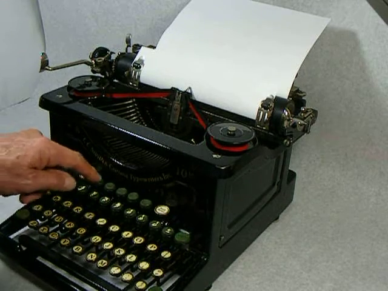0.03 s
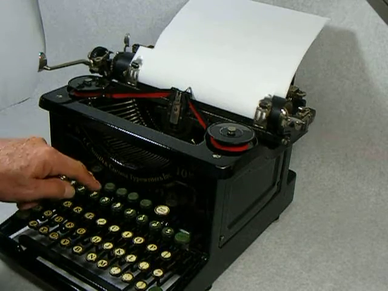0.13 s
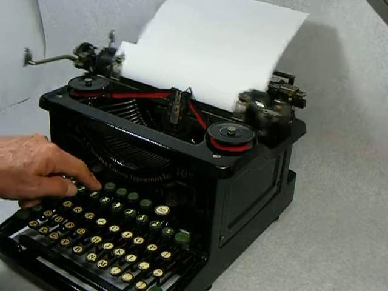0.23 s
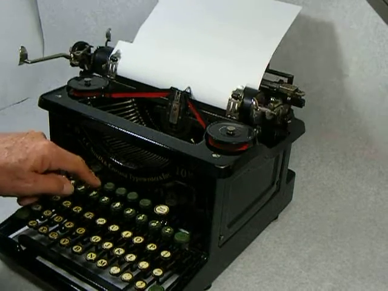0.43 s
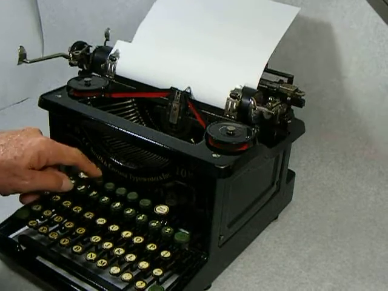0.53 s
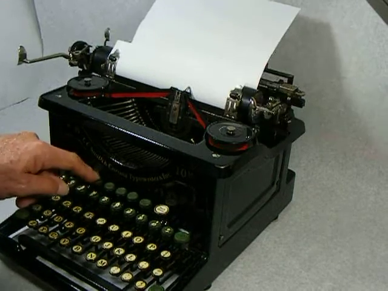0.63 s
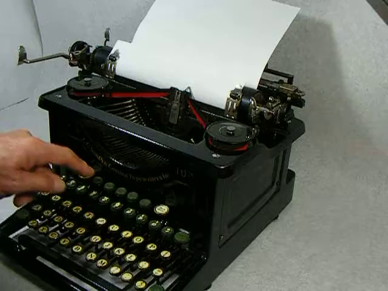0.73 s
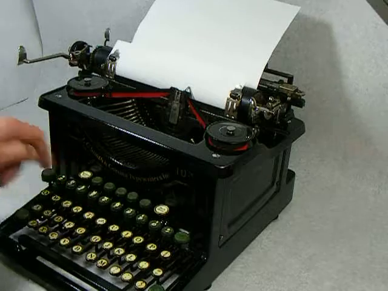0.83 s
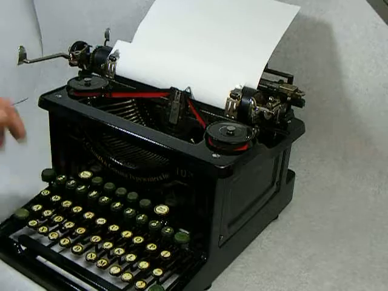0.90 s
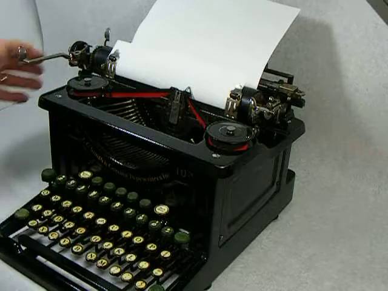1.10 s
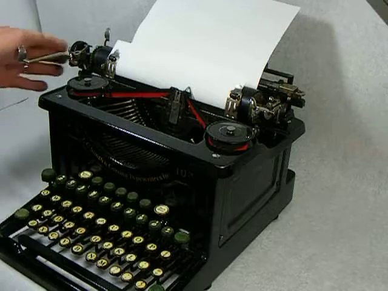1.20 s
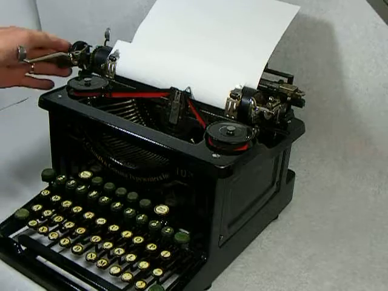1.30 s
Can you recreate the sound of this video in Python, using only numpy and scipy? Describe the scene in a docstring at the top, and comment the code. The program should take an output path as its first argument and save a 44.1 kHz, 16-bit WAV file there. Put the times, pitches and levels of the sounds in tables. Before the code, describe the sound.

An old typewriter key is struck, its heavy carriage rolling and clacking hard to a stop indoors

```python
"""Old typewriter key stroke

A key of an old cast-iron typewriter is pressed: the carriage is let go, rolls along its rail and slams into a stop;
the key is let up with a second clack and the parts settle. Blows and rolling are showers of tiny contacts
that ring the modes of the machine. A drone, ringing springs, a small room's echo and steady noise are added.
The recorder is coarse: few samples, big level steps and one click."""
import sys
import numpy as np
from scipy import signal
from scipy.fft import rfft, irfft
from scipy.io import wavfile
from scipy.ndimage import uniform_filter1d, map_coordinates

SR = 44100
rng = np.random.default_rng(int(sys.argv[2]) if len(sys.argv) > 2 else 0)


def convert_level_to_amplitude(level_db):
    """Map a level in decibels to its linear amplitude factor."""
    exponent = np.asarray(level_db, float) / 20
    return 10 ** exponent


def materialize(psi):
    """Save the field psi as 16-bit PCM at rate SR to the path in sys.argv[1].

    A 1-D psi becomes a single channel; in a 2-D psi each row is a channel.
    """
    bounded = np.clip(np.atleast_2d(psi).T, -1, 1)
    quanta = np.round(bounded * 32767).astype(np.int16)
    wavfile.write(sys.argv[1], SR, quanta)


N = 59535  # length in samples

# Blows of metal on metal, then parts settling. Each row: start in seconds, relative level in dB,
# strongest pitch in Hz, fall in dB one octave away, time in seconds for the rattle to fall 60 dB.
BLOWS = [(.176, -39, 1220, 10, .1), (.2055, -14, 2480, 7, 0.056), (0.207, -11, 5000, 16, 0.059),
         (.236, -16, 880, 1.5, 0.054), (.255, -23, 1800, -0.5, 0.071), (.326, -18, 1800, 14.5, .06),
         (0.3951, -7, 1844, 4.5, 0.017), (.398, -13, 190, 4.5, 0.091), (0.417, -14, 606, 7.5, 0.026),
         (.412, -15.5, 1800, 1, 0.045), (.431, -18.5, 1058, 14.5, 0.028), (0.458, -21.5, 2440, 3.5, 0.07),
         (.511, -22.5, 596, 2, 0.056), (.587, -29, 2600, 11, 0.15), (.611, -13.5, 3170, 8, 0.083),
         (.629, -7.5, 1100, 4.5, 0.021), (.638, -8.5, 178.5, 6.5, 0.041), (.642, -14.5, 1654, 1.5, 0.039),
         (.663, -24.5, 2145, -1, 0.061), (.737, -31, 2550, 8, 0.047), (.785, -26.5, 650, 7, 0.16),
         (.82, -29.5, 1930, 3.5, 0.034), (0.876, -38, 2514, 9.5, 0.018), (.917, -37, 1900, 5, 0.04),
         (1.022, -39.5, 413, 12, 0.03), (1.117, -37, 1923, 4.5, 0.062), (1.184, -37, 1730, 4.5, 0.026),
         (1.23, -47, 1200, 2.5, 0.029)]
# Rolling of the carriage and shudder of the frame. Each row: time in seconds, relative level in dB,
# tilt in dB per octave.
ROLLING = [(0.16, -54, -8), (0.208, -30, 3.5), (0.258, -30.5, -3.5), (0.274, -29, 0), (0.43, -14.5, -1.5),
           (0.476, -27, -0.5), (0.518, -19, -5), (0.618, -31.5, 0.5), (0.632, -16, -2.5),
           (0.696, -22.5, -4), (0.71, -26.5, -5), (0.99, -46.5, -5.5), (1.002, -70.5, 0.5),
           (1.026, -43, -4), (1.05, -41.5, -4.5)]
# Clear modes of frame, bars and springs. Each row: pitch in Hz, relative level in dB,
# time in seconds to fall 60 dB.
FRAME_MODES = [(107.9, -15.5, 0.14), (172, -0.5, .1), (235, -3, .12), (291, -6.5, 0.13),
               (350.8, -0.5, 0.19), (452.3, -1.17, 0.13), (515.1, -4.5, 0.15), (578.4, -3.5, 0.091),
               (660.2, -3.76, 0.1), (706, -6.5, .1), (1018, -6.5, 0.065), (1104, -5, 0.074),
               (1243, -7.5, 0.064), (1444, -8.5, 0.13), (1800, -8.5, 0.054), (2420, -9.5, 0.039),
               (2824, -3.5, 0.045)]
# Levels of the many small modes between them. Each row: pitch in Hz, relative level in dB.
SMALL_MODE_LEVEL = [(100, -20.5), (200, -9), (400, -5), (800, -10), (1500, -7), (2500, -7.5), (3500, -11),
                    (5300, -18.5)]
# How long the small modes ring. Each row: pitch in Hz, time in seconds to fall 60 dB.
SMALL_MODE_T60 = [(100, 0.14), (500, 0.077), (2000, 0.072), (5000, 0.03)]
# Drone of the rolling carriage. Each row: time in seconds, rms level in dB.
DRONE_LEVEL = [(0.19, -46.5), (0.209, -43), (0.251, -34), (0.336, -28.5), (0.367, -22), (0.409, -32),
               (0.431, -27.5), (0.451, -29.5)]
# Jolted parts that ring on. Each row: start in seconds, pitch in Hz, level of the jolt in dB,
# time in seconds to fall 60 dB.
SPRINGS = [(.425, 452, -24, .9), (0.38, 634, -12, 0.14), (0.71, 932, -32.5, 1.9), (.79, 711, -32.5, .4),
           (.79, 554, -34, 0.31), (.63, 85, -31, 0.44), (.64, 350, -34, 2.2), (.645, 292, -29.5, .9)]
# Tones still ringing from an earlier stroke. Each row: pitch in Hz, starting level in dB,
# time in seconds to fall 60 dB.
EARLIER_RING = [(2203, -52, 0.37), (355, -53.5, 3.8)]
# Colour of the room noise. Each row: pitch in Hz, relative level in dB per Hz.
AIR_COLOUR = [(20, -21.5), (60, -16.5), (150, -12.5), (350, -11.5), (700, -20), (1200, -22.5),
              (2000, -23.5), (3500, -30.5), (5500, -29)]


def rms_one(x):
    """Scale to an rms of 1."""
    return x / np.sqrt(np.mean(x ** 2) + 1e-20)


def at_hz(points, hz):
    """Read a table between its points, with pitch on a log scale."""
    table_hz, values = np.transpose(points)
    return np.interp(np.log(hz), np.log(table_hz), values)


def level_curve(times, db):
    """Turn levels in dB into a curve over time, all but silent outside the table."""
    return np.interp(np.arange(N) / SR, times, db, left=-99, right=-99)


def ring(force, hz, t60):
    """A mode is a resonator: a unit click sets a dying sine of starting height 1 ringing."""
    shrink = convert_level_to_amplitude(-60 / (max(t60, .01) * SR))  # per sample
    turn = 2 * np.pi * hz / SR
    # the tiny constant keeps the filter from slowing down on near-zero numbers
    return signal.lfilter([0, np.sin(turn)], [1, -2 * shrink * np.cos(turn), shrink ** 2], force + 1e-18)


def body_modes():
    """Metal rings at a few clear modes and many small ones, with more per octave towards the treble."""
    hz = np.linspace(10, 73, num=130) ** 2 * rng.uniform(.985, 1.015, size=130)
    small = zip(hz, at_hz(SMALL_MODE_LEVEL, hz), at_hz(SMALL_MODE_T60, hz))
    return list(FRAME_MODES) + list(small)


def contact_heights(size):
    """Contacts differ in strength: most are near the lowest, a few stand out (in units of the spread)."""
    return np.minimum(rng.exponential(size=size), 4)


def rolling_contacts():
    """Rolling metal touches in a random stream of tiny clicks, up or down."""
    contacts_per_s, spread_db = 1400, 3
    signs = np.sign(rng.standard_normal(N))
    touching = rng.random(N) < contacts_per_s / SR
    return rms_one(signs * touching * convert_level_to_amplitude(spread_db * contact_heights(N)))


def machine():
    """Blows are dying bursts of tiny contacts, rolling is a stream of them; all ring the same modes."""
    blow_level_db, mode_scatter_db, first_contact_db, roll_level_db = -27.5, 3.5, 12.5, -33.5
    burst_time = np.arange(4000) / SR  # a burst is cut off after 4000 samples
    size = len(burst_time)

    blow_s, blow_db, blow_hz, blow_fall, rattle_s = np.transpose(BLOWS)
    rattle_s = np.maximum(rattle_s, .004)[:, None]
    shape = (len(blow_s), size)
    grit = rng.standard_normal(shape) * convert_level_to_amplitude(1.3 * contact_heights(shape))
    grit = grit * (rng.random(shape) < .4)  # gaps between contacts
    # a longer rattle spreads its force more thinly
    fades = convert_level_to_amplitude(-60 * burst_time / rattle_s) / np.sqrt(100 * rattle_s)

    roll_s, roll_db, roll_tilt = np.transpose(ROLLING)
    roll_db = level_curve(roll_s, roll_db)
    roll_tilt = np.interp(np.arange(N) / SR, roll_s, roll_tilt)
    contacts = rolling_contacts()

    modes, out = body_modes(), np.zeros(N)
    scatter = rng.standard_normal((len(blow_s), len(modes)))
    starts = (blow_s * SR).astype(int)
    for k, (hz, db, t60) in enumerate(modes):
        tilt_octaves = max(np.log2(hz / 1000) + 1.5, 0)  # the tilt starts 1.5 octaves below 1000 Hz
        rolling = contacts * convert_level_to_amplitude(roll_level_db + roll_db + roll_tilt * tilt_octaves)
        force = np.append(rolling, np.zeros(size))  # spare space for late bursts
        blow_colour = -blow_fall * np.log2(hz / blow_hz) ** 2
        gains = convert_level_to_amplitude(blow_level_db + blow_db + blow_colour + mode_scatter_db * scatter[:, k])
        bursts = np.roll(grit, 29 * k, axis=1) * fades  # each mode gets the grit shifted in time
        bursts[:, 0] = convert_level_to_amplitude(first_contact_db)
        for start, gain, burst in zip(starts, gains, bursts):
            force[start:start + size] += gain * burst
        sign = (-1) ** k  # neighbours in the list move in opposite directions
        out += sign * convert_level_to_amplitude(db) * ring(force[:N], hz, t60)
    return out


def drone():
    """The rolling carriage drones: a sine whose pitch wavers slightly, under its level curve."""
    pitch_hz, waver_hz = 340.3, 8  # the waver is an rms value
    waver = rms_one(uniform_filter1d(rng.standard_normal(N), size=900))
    cycles = np.cumsum(pitch_hz + waver_hz * waver) / SR
    level = convert_level_to_amplitude(level_curve(*np.transpose(DRONE_LEVEL)))
    return level * np.sqrt(2) * np.sin(2 * np.pi * cycles)


def springs():
    """Each short, soft-edged jolt leaves one lightly damped part ringing."""
    jolt = np.hanning(60) / 30  # 60 samples long
    out = np.zeros(N)
    for start, hz, db, t60 in SPRINGS:
        click = np.arange(N) == int(start * SR)
        force = convert_level_to_amplitude(db) * np.convolve(click, jolt)[:N]
        out += ring(force, hz, t60)
    return out


def room(x):
    """Walls send sound round ten feedback delays, fainter and duller on every round."""
    t60, wall_cut_hz = 0.19, 4800  # t60 in seconds, for the bass
    out, dull = np.zeros(N), np.exp(-2 * np.pi * wall_cut_hz / SR)
    lags = (rng.uniform(.012, .04, size=10) * SR).astype(int)
    for k, lag in enumerate(lags):
        loop, gain, state = x.copy(), convert_level_to_amplitude(-60 * lag / SR / t60), [0.]
        for i in range(lag, N, lag):
            back, state = signal.lfilter([gain * (1 - dull)], [1, -dull], loop[i - lag:i], zi=state)
            loop[i:i + lag] += back[:N - i]
        out += (loop - x) * (-1) ** k  # echoes only
    return out


def earlier_ring():
    """Metal struck earlier still rings: faint sines die away from the start."""
    t, out = np.arange(N) / SR, np.zeros(N)
    for hz, db, t60 in EARLIER_RING:
        out += convert_level_to_amplitude(db - 60 * t / t60) * np.sin(2 * np.pi * (hz * t + rng.random()))
    return out


def air():
    """Steady room noise: white noise coloured by pitch, at an rms of -45 dB."""
    hz = np.maximum(np.arange(N // 2 + 1) * SR / N, 5)
    spectrum = rfft(rng.standard_normal(N)) * convert_level_to_amplitude(at_hz(AIR_COLOUR, hz))
    return convert_level_to_amplitude(-45) * rms_one(irfft(spectrum, N))


def scene():
    """The machine, with its deepest bass cut, sounds in its room."""
    near = machine() + drone() + springs()
    near = signal.sosfilt(signal.butter(N=2, Wn=49.7, btype="high", fs=SR, output="sos"), near)
    echo = convert_level_to_amplitude(-21) * room(near)
    return (near + echo + earlier_ring() + air())[None]


def glitch():
    """The signal jumps once with a click and slides back exponentially."""
    start_s, level_db, fade_s = .78701, -29, .0004  # fade_s is the time to shrink to 37 percent
    after = np.arange(N) / SR - start_s
    return convert_level_to_amplitude(level_db) * (after > 0) * np.exp(-np.abs(after) / fade_s)


def top_cut(x):
    """Nothing passes above the cut-off."""
    return signal.sosfilt(signal.butter(12, 6080, fs=SR, output="sos"), x)


def record(dry):
    """A coarse recorder rounds every fourth sample to level steps and joins them by a smooth curve."""
    step, offset = .00553, -.0104  # where full scale is 1
    x = signal.sosfilt(signal.butter(N=4, Wn=5590, fs=SR, output="sos"), dry[0])
    coarse = step * np.round((x[::4] + offset) / step)
    x = map_coordinates(coarse, [np.arange(N) / 4], order=3, mode="nearest")
    x = signal.sosfiltfilt(signal.butter(N=6, Wn=5610, fs=SR, output="sos"), x)
    mix = x + glitch()
    return top_cut(mix[None])


dry = scene()
out = record(dry)
materialize(out)
```